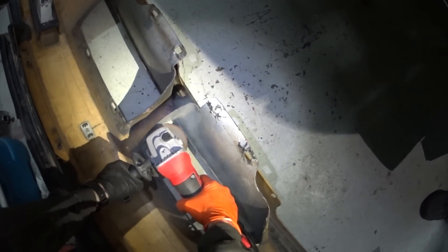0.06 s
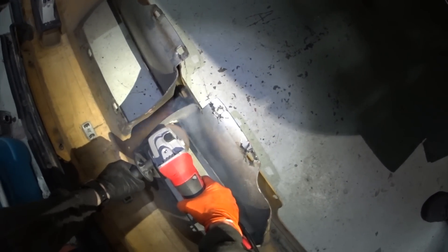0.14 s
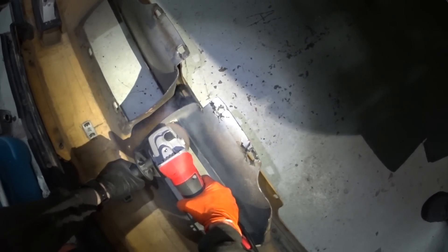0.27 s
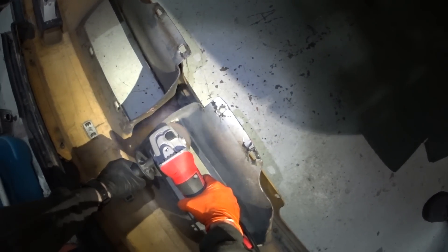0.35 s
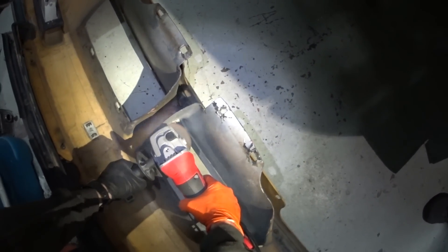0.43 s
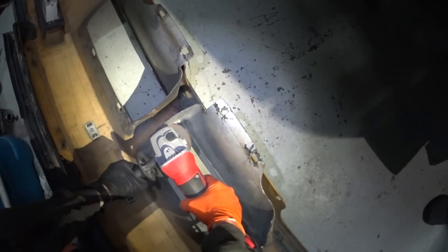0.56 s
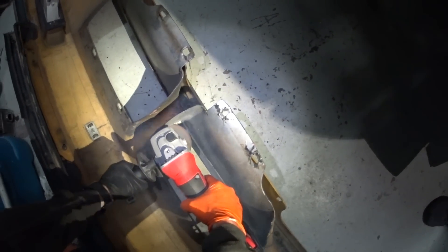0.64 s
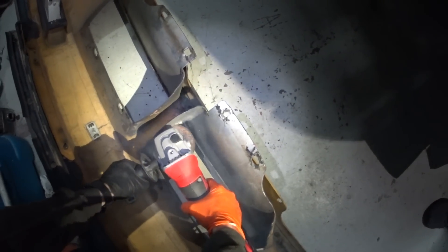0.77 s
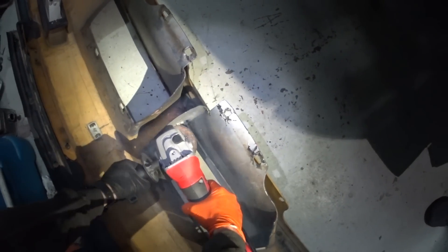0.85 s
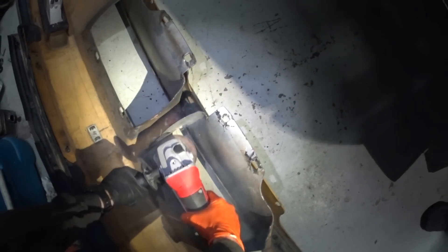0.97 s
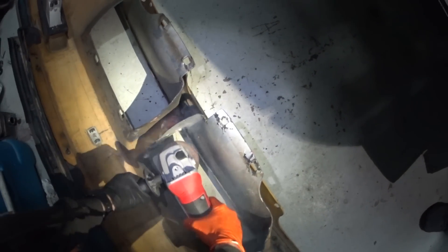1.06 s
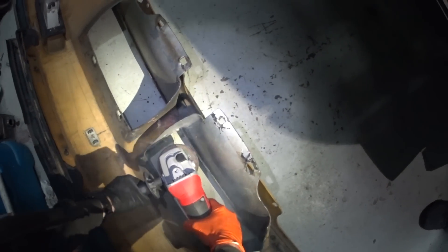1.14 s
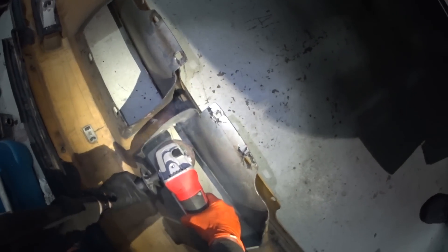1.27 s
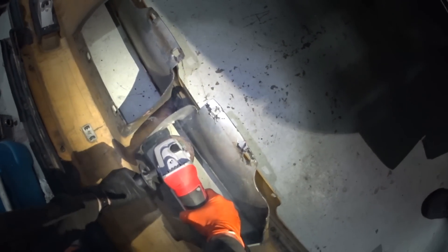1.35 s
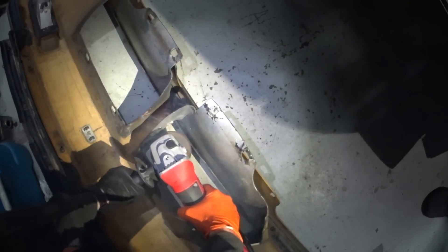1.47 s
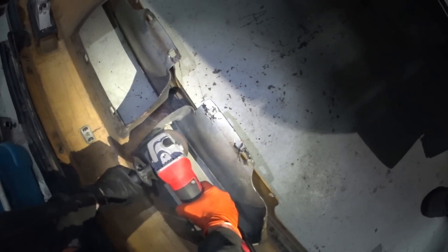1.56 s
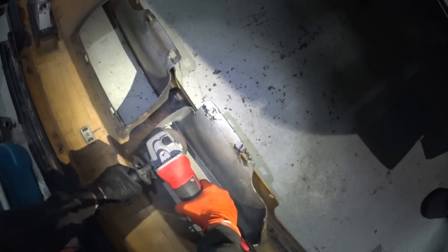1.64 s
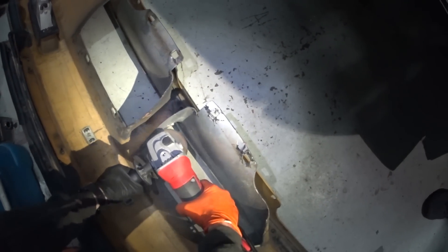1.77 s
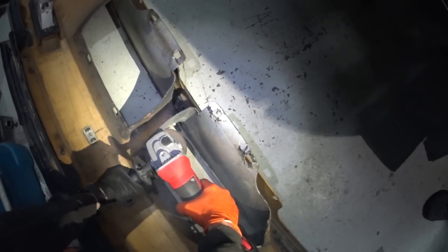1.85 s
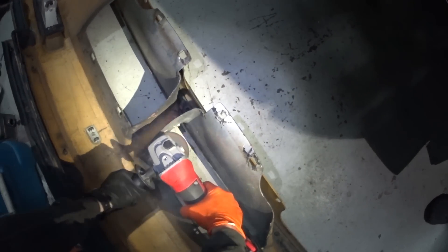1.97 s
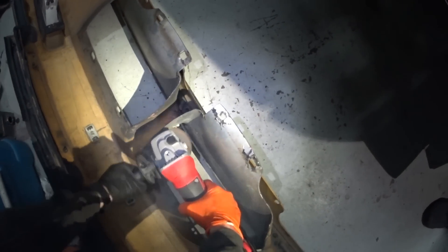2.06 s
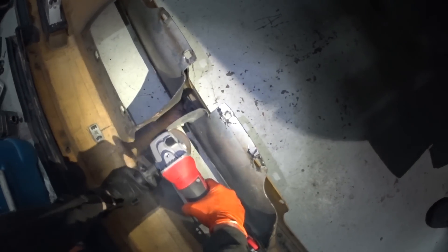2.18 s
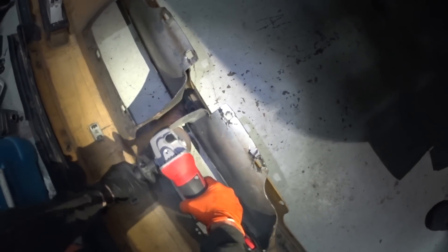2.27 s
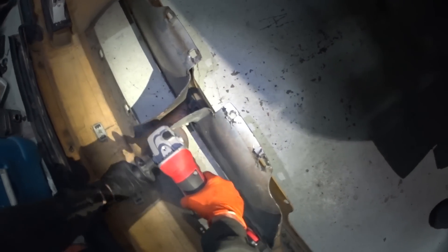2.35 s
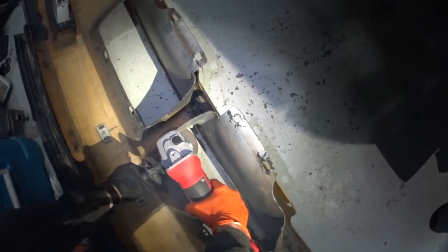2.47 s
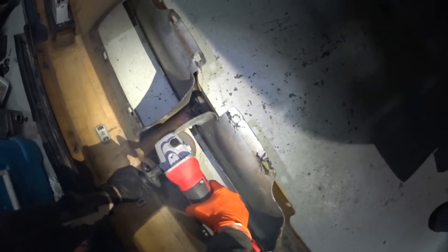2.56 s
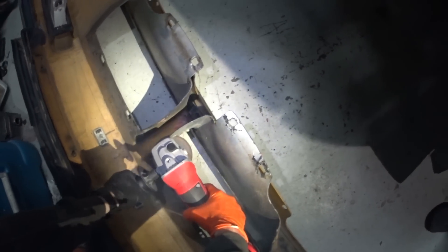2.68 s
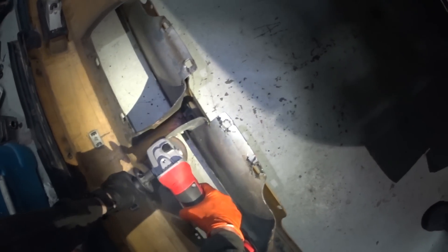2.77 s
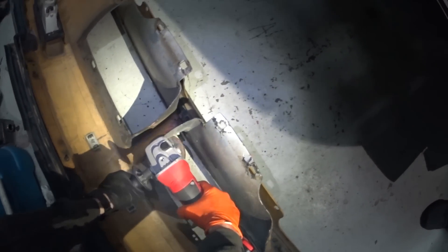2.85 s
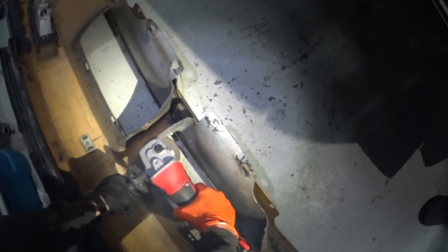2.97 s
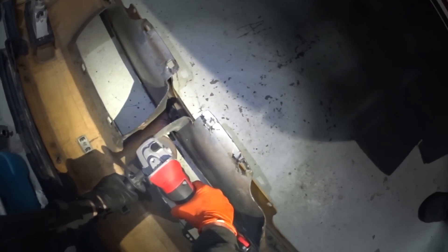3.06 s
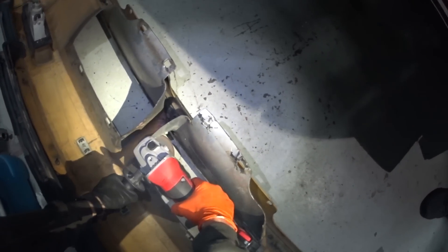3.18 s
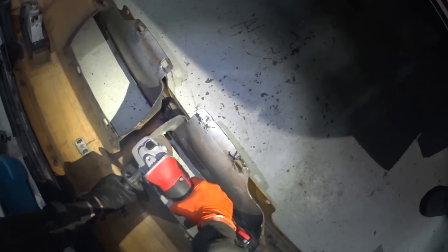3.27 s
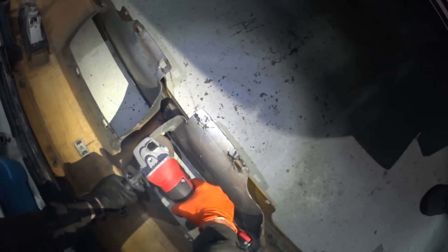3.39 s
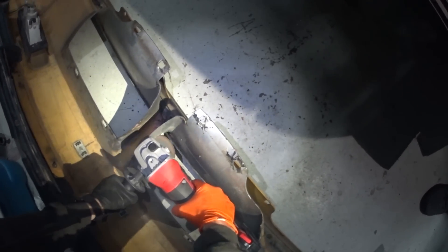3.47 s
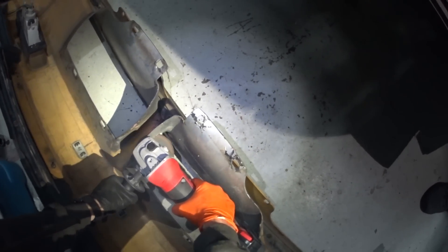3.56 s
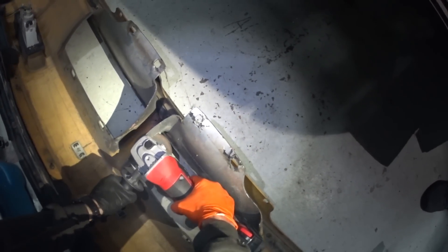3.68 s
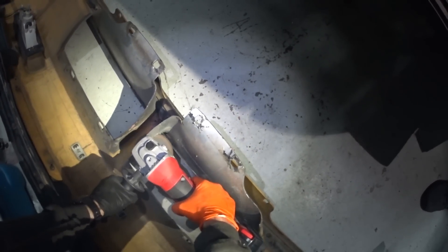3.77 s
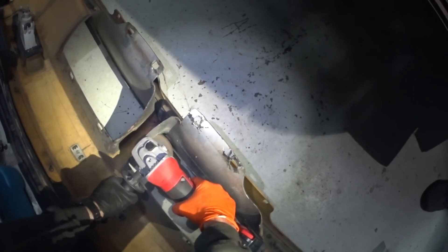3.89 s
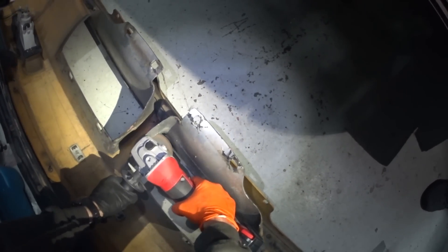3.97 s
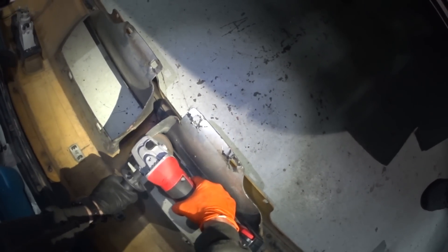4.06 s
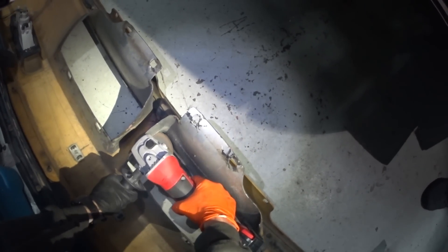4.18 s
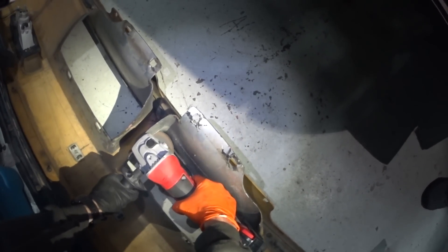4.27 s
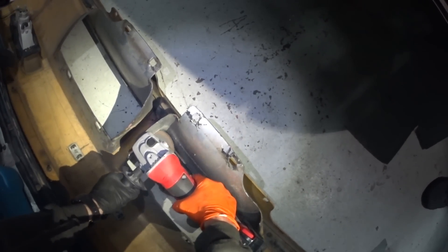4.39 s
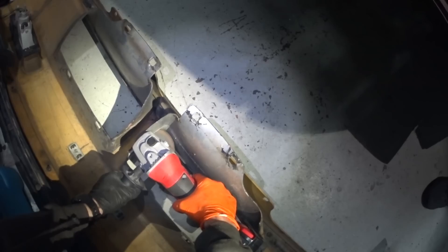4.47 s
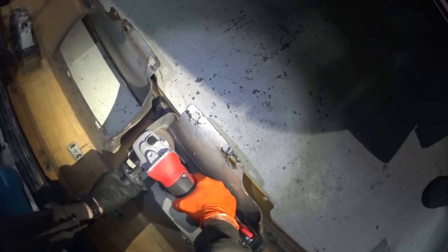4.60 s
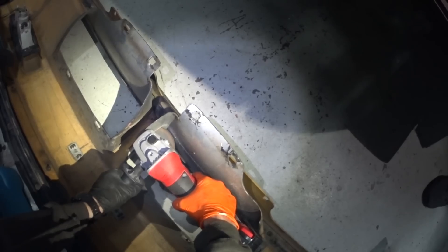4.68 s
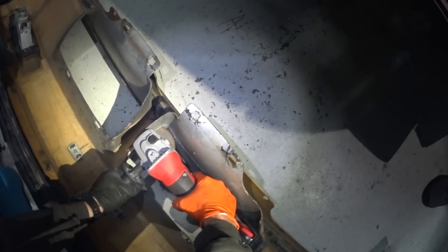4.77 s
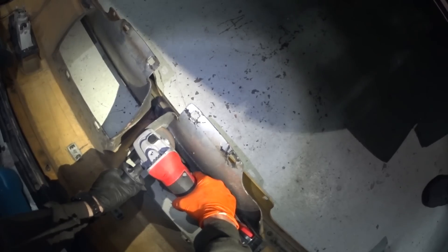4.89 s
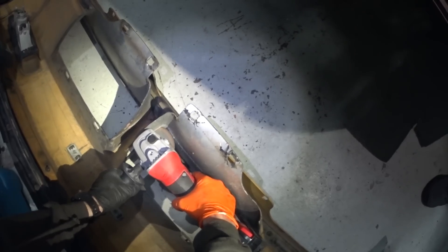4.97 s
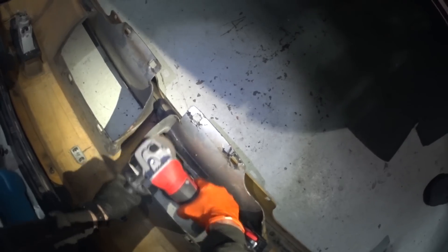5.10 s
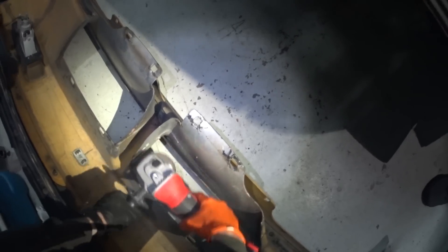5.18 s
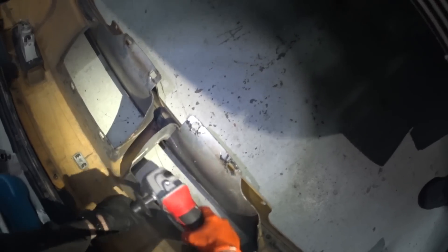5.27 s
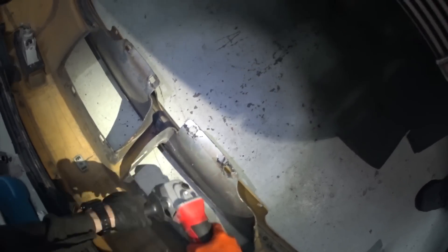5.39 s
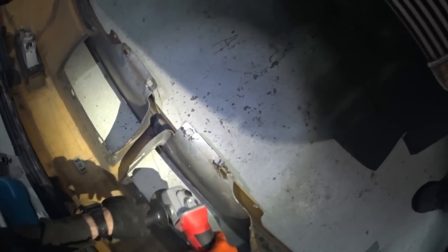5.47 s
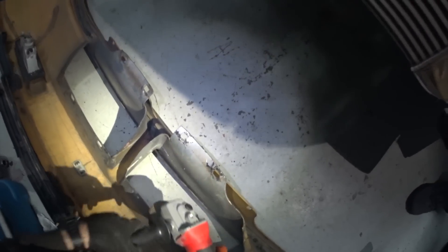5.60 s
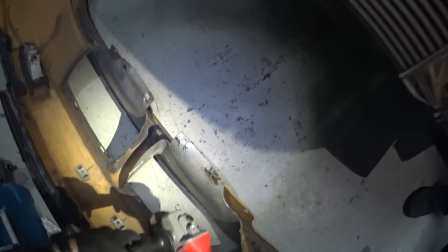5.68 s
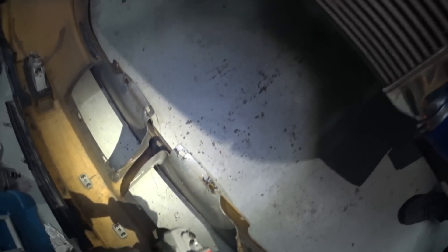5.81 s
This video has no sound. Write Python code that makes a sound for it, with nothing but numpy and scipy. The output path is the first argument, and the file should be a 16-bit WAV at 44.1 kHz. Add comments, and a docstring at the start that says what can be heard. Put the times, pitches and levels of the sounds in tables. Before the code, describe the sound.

Very close to the microphone, a handheld rotary cutter is already grinding into a plastic car panel, its buzz sagging in pitch until it stops. A few short scrapes and a switch click follow, then a faster, rougher second run ending in a squeak. A third, steadier run lasts about two seconds before the motor winds down amid bright rattles and rustling in a small workshop.

```python
"""Rotary cutter in a plastic panel

A handheld rotary cutter bites into a plastic car panel in three runs, close by, in a workshop.
Each turn strikes the same two tooth blows, set off the panel's ringing; irregular chatter blurs them into noise.
Gears sing and blade modes ping along. Between runs, short noise strokes are single teeth snagging.
A 15-slot motor whines in sine partials when it runs free. Short ringing modes make a squeak as the second
run ends and a rattle as the tool slows and is lifted away, with fine noise grains for the rustle."""
import sys
import numpy as np
from scipy import signal
from scipy.fft import rfft, irfft
from scipy.io import wavfile
from scipy.ndimage import uniform_filter1d

SR = 44100
rng = np.random.default_rng(int(sys.argv[2]) if len(sys.argv) > 2 else 0)


def generate_wav(sig):
    """Save sig (samples, or channels by samples) to the path in sys.argv[1] as 16-bit PCM at SR."""
    pcm = np.round(np.clip(np.atleast_2d(sig).T, -1, 1) * 32767).astype(np.int16)
    wavfile.write(sys.argv[1], SR, pcm)


N = 257544
T = np.arange(N) / SR


def amp(db):
    """Turn dB into a gain."""
    return 10 ** (np.asarray(db) / 20)


def rms_one(x):
    """Scale a sound to rms 1."""
    return x / np.sqrt(np.mean(x ** 2) + 1e-20)


def in_time(rows):
    """Read each column of a curve table at every sample."""
    s, *columns = np.transpose(rows)
    return [np.interp(T, s, c) for c in columns]


def while_on(start, stop, fade, t=T):
    """Gain of 1 from start to stop, fading in a straight line outside."""
    return np.clip(np.minimum(t - start, stop - t) / fade + 1, 0, 1)


def swell(full, until, rise, fall):
    """Gain that climbs, holds at 1 and falls, at rates in dB per s."""
    return amp(-rise * np.maximum(full - T, 0) - fall * np.maximum(T - until, 0))


def fourier_hz():
    """Frequency of each bin of a whole-length Fourier spectrum, kept at 1 Hz or more for the log axis."""
    return np.maximum(np.arange(N // 2 + 1) * SR / N, 1)


def at_hz(points, hz):
    """Read a spectrum table on a log frequency axis."""
    table = np.array(points)
    return np.interp(np.log(hz), np.log(table[:, 0]), table[:, 1])


def shape(spectrum, peaks=()):
    """Gain by frequency: a smooth spectrum plus resonance bumps and hollows."""
    hz = fourier_hz()
    bumps_db = sum(db / (1 + ((hz - centre) / (width / 2)) ** 2) for centre, width, db in peaks)
    return amp(at_hz(spectrum, hz) + bumps_db)


def colour(x, spectrum):
    """Filter a sound by a spectrum table."""
    return irfft(rfft(x) * shape(spectrum), N)


def band(bins, low_hz, high_hz, slope=5.8):
    """One smooth-edged frequency band of a Fourier spectrum, as sound of rms 1."""
    hz = np.arange(N // 2 + 1) * SR / N + 1
    below_high = 1 / (1 + (hz / high_hz) ** (2 * slope))
    below_low = 1 / (1 + (hz / low_hz) ** (2 * slope))
    return rms_one(irfft(bins * (below_high - below_low), N))


def drift(rate):
    """Slow random wander of spread 1; a higher rate in Hz wanders faster."""
    r = np.exp(-2 * np.pi * rate / SR)
    return rms_one(signal.lfilter([1], [1, -2 * r, r * r], rng.standard_normal(N + SR))[SR:])


def tooth_blows(turns_per_s, wander=.0015, second_db=-5, half=.47, ring_t60=0.05, ripple=0.35, creep=0.62):
    """Two uneven blows a turn set off the panel's dense ringing, which changes slowly as the blade advances."""
    turn = np.cumsum(turns_per_s * (1 + wander * drift(15))) / SR
    clicks = np.zeros(N + 1)
    for offset, db in [(0, 0), (half, second_db)]:
        at = np.flatnonzero(np.diff(np.floor(turn + offset))) + 1
        late = (turn[at] + offset) % 1 * SR / turns_per_s[at]   # the blow falls between two samples
        clicks[at - 1] += amp(db) * late
        clicks[at] += amp(db) * (1 - late)

    t = np.arange(4096) / SR
    rings = rfft(rng.standard_normal((2, 4096)) * amp(-60 * t / ring_t60))
    rings = irfft(rings / np.abs(rings) ** (1 - ripple))   # many modes even out the response
    angle = creep * drift(0.99)
    mixes = [np.cos(angle), np.sin(angle)]   # slow crossfade between the two ringings
    blows = sum(signal.fftconvolve(clicks[:N] * mix, ring)[:N] for mix, ring in zip(mixes, rings))
    return blows / np.sqrt(uniform_filter1d(blows ** 2, size=4000) + 1e-9), turn


def chatter(turn):
    """Irregular blows: noise that pulses twice a turn and flickers in level, at rms 1."""
    pulses = 1 + 0.21 * np.cos(4 * np.pi * turn)
    return rms_one(rng.standard_normal(N) * pulses * amp(2.67 * drift(30)))


CHATTER, SETTLE_S = .8, .06   # usual share of irregular blows (0-1), fade into and out of steady cutting
# spells of steadier cutting: start_s, end_s, irregular_share (0-1)
STEADY_SPELLS = [(0, .72, .09), (1.73, 1.91, .22), (2.32, 2.36, .5), (2.52, 2.59, .1), (3.2, 3.75, .12),
                 (3.75, 5.0, .07)]


def chatter_share():
    """The blade chatters, except while it cuts steadily."""
    calm = [(CHATTER - least) * while_on(a, b, SETTLE_S) for a, b, least in STEADY_SPELLS]
    return CHATTER - np.max(calm, axis=0)


def gear_song(turn, teeth=68):
    """Gear teeth meshing: a sine at the tooth rate, wavering in phase and level."""
    waver = 1.2 * np.sin(4 * np.pi * turn) + .6 * drift(30)
    return np.sin(2 * np.pi * teeth * turn + waver) * amp(3.6 * drift(9.1))


PING_DB, PING_T60_S = 0, .0065   # level relative to the buzz, decay time of one resonator
# ringing modes of the blade: pitch_hz, level_db (relative), point in the turn (0-1)
BLADE_MODES = [(2050, -8, .3), (2750, 0.5, 0), (3500, -2, .76), (5500, -5, .7)]


def ping(turn):
    """Each blade mode swells and rings briefly once a turn, at its own point of the turn; rms 1."""
    r, out = amp(-60 / (PING_T60_S * SR)), 0
    for hz, db, point in BLADE_MODES:
        ring = np.diff(np.floor(turn - point), prepend=0)
        for again in range(2):   # two resonators in a row make the soft swell
            ring = signal.lfilter([1, 0, -1], [1, -2 * r * np.cos(2 * np.pi * hz / SR), r * r], ring)
        out = out + amp(db) * ring
    return rms_one(out)


# cutting runs: full_s, until_s, fall_db_per_s, drone_db, buzz_db, hiss_db (levels before bite and the rest)
RUNS = [(-.3, 0.721, 900, -24.5, -21, -20.5), (1.427, 2.766, 304, -24.5, -21, -18.5),
        (2.97, 5.181, 600, -23.5, -21.5, -20.3)]
RISE_DB_PER_S = 1900
# cutting spectrum, one list per run: pitch_hz, level_db (per Hz, relative within a band)
CUT_SPECTRA = [
    [(59, -77.5), (100, -44), (493, -30.5), (601, -18), (1250, -8.5), (2080, -1.5), (3910, -8), (8260, -17),
     (10100, -12), (11100, -12)],
    [(59, -69), (100, -33.5), (216, -23), (353, -14.5), (438, -12.5), (1090, -0.5), (2790, -1.5),
     (4570, -1), (9480, 4), (11100, 2)],
    [(59, -80), (100, -44), (170, -28), (421, -12), (523, -9.5), (1060, -3), (1490, -8), (2740, -7.5),
     (4570, -13), (9860, -8.5), (11100, -11.5)],
]
# panel and blade resonances, one list per run as the place of the cut shifts:
# pitch_hz, width_hz, level_db (negative is a hollow)
PANEL_PEAKS = [
    [(627, 88, 6), (866, 45, 10.5), (1087, 140, 9), (1266, 160, 7.5), (1640, 92, 9), (2060, 130, 4),
     (3940, 1100, -8), (6930, 310, 14), (9840, 380, 9)],
    [(728, 44, 4.5), (1810, 200, -3), (2780, 1100, 5.5), (4172, 1600, -5), (6700, 250, 7), (9160, 320, 6)],
    [(630, 135, 5), (1088, 130, 5.5), (1290, 120.1, 5), (880, 41, 3.5), (2030, 620, 3), (4530, 1300, -3.5),
     (6550, 110, 3), (9340, 995, 3)],
]
# how hard the blade bites, and the boom below about 600 Hz: time_s, bite_db, boom_db
BITE = [(0, 1, -46), (.33, -1, -48), (.72, 0, -31.5), (1.44, -4, -66), (1.51, -7, -64), (1.55, -20.5, -60),
        (1.63, -18.5, -56), (1.68, -12.5, -58), (1.742, -11, -32.5), (1.87, -11.5, -40), (1.98, -3.5, -40),
        (2.03, -11.5, -42), (2.164, 2, -42.5), (2.218, -2, -25.5), (2.296, 3.5, -44), (2.416, 1, -30.5),
        (2.52, 0, -33.5), (2.61, 2, -26), (2.71, 0, -32.5), (2.8, -7, -39), (2.97, -8.5, -58),
        (3.01, -6, -32.5), (3.13, -0.5, -32.5), (3.34, 0.5, -42), (3.46, 3, -31.5), (3.66, -4.5, -35),
        (3.73, 2.5, -32), (4.21, -0.5, -35.5), (4.7, 0, -30), (4.99, -2, -38), (5.04, -4, -28.5),
        (5.18, -3, -44.5)]
BUZZ_FOLLOWS, HISS_FOLLOWS = 0.48, -0.12   # dB per dB of bite
# the buzz swells briefly: time_s, extra_db
BUZZ_SWELLS = [(.52, 3.96), (1.75, 7.1), (1.93, 5), (2.16, 3.3), (3.04, 3.95), (5.17, 7.7)]
BUZZ_SWELL_S = 0.046   # spread of each swell before and after its time
HISS_BUILD_DB, HISS_BUILD_S = 5, .08   # the hiss builds up late
HISS_EARLY_S, HISS_EARLY_DB_PER_S = .2, 28   # and thins before the stop


def cutting(turns):
    """Regular blows and irregular chatter share the panel and blade resonances; gears and pings join in."""
    bite_db, boom_db = in_time(BITE)
    buzz_swell_db = sum(db * np.exp(-((T - s) / BUZZ_SWELL_S) ** 2) for s, db in BUZZ_SWELLS)
    regular, turn = tooth_blows(turns)
    irregular = chatter(turn)
    share = chatter_share()
    slower_db = 22 * np.minimum(np.log2(turns / 76), 0)   # a labouring blade loses its top
    gears = (1 - share) * gear_song(turn)
    pings = (1 - share) ** 3 * ping(turn)   # chatter smears the ping

    out = shudder(turn)
    for row, spectrum, peaks in zip(RUNS, CUT_SPECTRA, PANEL_PEAKS):
        full, until, fall, drone_db, buzz_db, hiss_db = row
        drone_db = drone_db + bite_db
        buzz_db = buzz_db + BUZZ_FOLLOWS * bite_db + buzz_swell_db
        hiss_db = hiss_db + HISS_FOLLOWS * bite_db
        hiss_db -= HISS_BUILD_DB * np.exp(-np.abs(T - full) / HISS_BUILD_S)
        hiss_db -= HISS_EARLY_DB_PER_S * np.maximum(T - until + HISS_EARLY_S, 0)
        # low_hz, high_hz, blur power (a smaller one lets chatter in sooner: treble blurs first), level_db
        bands = [(102, 628, 1.3, boom_db),
                 (614, 1450, 1.24, drone_db),
                 (1480, 4270, 0.65, buzz_db),
                 (4410, 7020, 0.7, hiss_db - 5.5 - 0.11 * slower_db),
                 (7520, 12600, 0.42, hiss_db - 3.5 + slower_db)]
        run = amp(hiss_db - 9.5 + slower_db) * gears + amp(buzz_db + PING_DB) * pings
        panel = shape(spectrum, peaks)
        for low, high, blur, db in bands:
            blows = np.sqrt(1 - share ** blur) * regular + np.sqrt(share ** blur) * irregular
            run += amp(db) * band(rfft(blows) * panel, low, high)
        out += swell(full, until, RISE_DB_PER_S, fall) * run
    return out


PATCHY_DB, PATCH_BINS, PATCH_FRAMES = 1.5, 3, 14   # depth; width and length in frame cells


def patches(cells):
    """Randomly shifting colour: smoothed hills and hollows over frequency and time, of spread 1."""
    field = rng.standard_normal(cells)
    for again in range(2):
        field = uniform_filter1d(field, size=PATCH_BINS, axis=0)
        field = uniform_filter1d(field, size=PATCH_FRAMES, axis=1)
    return rms_one(field)


# resonances that bloom and glide as the blade moves through the panel:
# start_s, end_s, from_hz, to_hz, width_hz, level_db (negative is a hollow)
BLOOMS = [(0.042, 0.457, 1110, 1053, 90, 8), (.18, 0.337, 1270, 1200, 100, 6.5),
          (.39, .73, 1440, 1170, 110, 9), (.4, 0.567, 2250, 2090, 120, 7.5), (0, .13, 1670, 1630, 70, 7),
          (.56, .73, 2710, 2870, 200, 4.5), (.54, .72, 4370, 4330, 500, 6), (1.43, 1.51, 1000, 990, 120, 7),
          (1.53, 1.68, 1700, 2300, 1500, -6), (1.88, 2.32, 2100, 2040, 150, 6),
          (1.934, 1.98, 2870, 2650, 200.2, 5), (2.1, 2.126, 1500, 1499, 400, 8),
          (1.73, 1.873, 810, 720, 300, 6.5), (2.51, 2.596, 1200, 1200, 250, 5),
          (3.15, 3.45, 715, 690, 60, 5.5), (3.2, 3.534, 1140, 1050, 100, 7.5),
          (3.16, 3.44, 2970, 3000, 300, 5.5), (3.2, 3.4, 2450, 2450, 400, -5.5),
          (3.46, 3.6, 2500, 2320, 200.1, 5), (3.59, 3.923, 1249, 1193, 120, 12.5),
          (3.66, 4.1, 435, 416, 45, 15.5), (3.8, 3.88, 3300, 3180, 250, 6.5),
          (4.15, 4.651, 2430, 2200, 220, -14.5), (4.16, 4.95, 2780, 2800, 330, 4.5),
          (4.65, 4.9, 4500, 4450, 200, -8), (4.91, 5.03, 4400, 4550, 600, -14),
          (3.92, 4.68, 3510, 3490, 100, 4), (5.02, 5.18, 1100, 1160, 150, 7.5),
          (5.12, 5.2, 2080, 2199, 200, 4.5)]
BLOOM_FADE_S = 0.033


def blooms(x):
    """Passing resonances and random patches colour the sound frame by frame."""
    hz, s, frames = signal.stft(x, SR, nperseg=1024, noverlap=768)
    db = PATCHY_DB * patches(frames.shape)
    for a, b, from_hz, to_hz, width, top_db in BLOOMS:
        on = while_on(a, b, BLOOM_FADE_S, s)
        centre = np.interp(s, [a, b], [from_hz, to_hz])
        db = db + top_db * on / (1 + ((hz[:, None] - centre) / (width / 2)) ** 2)
    return signal.istft(frames * amp(db), SR, nperseg=1024, noverlap=768)[1][:N]


# colour of the steady workshop noise: pitch_hz, level_db (per Hz, relative)
SHOP_SPECTRUM = [(59, -43), (100, -8), (837, 0), (1100, -9), (2920, -6.5), (9240, -19), (11500, -33.5),
                 (15000, -65.5)]
SHOP_DB = -65


def workshop():
    """Steady background: noise filtered to the workshop's colour."""
    return amp(SHOP_DB) * rms_one(colour(rng.standard_normal(N), SHOP_SPECTRUM))


# single teeth snagging between runs: time_s, level_db (relative), treble_db (over the low part)
SNAGS = [(0.763, -35, -10), (0.811, -19.5, -0.5), (0.916, -32, 0.5), (.93, -37, 2), (1.015, -30.5, 6.5),
         (1.027, -23.5, 5), (1.04, -29, 1.5), (1.05, -25.5, 1), (1.077, -28.5, 5), (1.11, -13, 3),
         (1.129, -29, 2), (1.142, -26, -1), (1.151, -18, 5), (1.181, -31, 4.5), (2.895, -37.5, 9.5)]
SNAG_RISE_S_PER_DB, SNAG_T60_S = .00022, 0.053


def snags():
    """Short scrapes: panel noise that swells and dies; the weaker, the slower the swell."""
    noise = rfft(rng.standard_normal(N)) * shape(CUT_SPECTRA[1], PANEL_PEAKS[1])
    low, high = band(noise, 324, 4850), band(noise, 4200, 14000)
    out = np.zeros(N)
    for s, db, treble_db in SNAGS:
        rise = SNAG_RISE_S_PER_DB * -db
        t = T - s + 0.75 * rise   # the swell begins a little before the listed time
        stroke = np.clip(t / rise, 0, 1) ** 2 * amp(-60 * np.maximum(t - rise, 0) / SNAG_T60_S)
        out += amp(db - 5) * stroke * (low + amp(treble_db) * high)
    return out


def trigger(s=1.381, db=-50, hz=2100, t60=0.027):
    """The switch clicks before the second run: a dying burst of mid-band noise."""
    burst = amp(db - 60 * np.maximum(T - s, 0) / t60) * (T > s)
    return burst * band(rfft(rng.standard_normal(N)), 0.68 * hz, 1.4 * hz)


SLOTS = 15   # whine cycles per spindle turn
# motor running free: start_s, end_s, first_db, second_db, third_db (partials at the start),
# fade_db_per_s (times 1.5, 2.5 and 3.5 for the three partials)
FREE_RUNNING = [(1.554, 1.915, -42, -52, -31.5, 1), (5.208, 5.54, -54, -50, -60, 14),
                (5.555, 5.664, -58, -75, -80, 14)]


def whine(turns):
    """Motor slots passing by: three wavering partials of the slot rate."""
    phase = 2 * np.pi * np.cumsum(SLOTS * turns * (1 + 0.00099 * drift(33))) / SR
    partials = [np.sin((k + 1) * phase) * amp(3.0 * drift(14)) for k in range(3)]
    out = np.zeros(N)
    for a, b, *levels, fade in FREE_RUNNING:
        on = while_on(a, b, 0.017)
        for k, db in enumerate(levels):
            fading_db = db - (k + 1.5) * fade * np.maximum(T - a, 0)
            out += on * amp(fading_db) * partials[k]
    return np.sqrt(2) * out


# shudders of the loose panel: full_s, until_s, level_db
SHUDDERS = [(2.58, 2.69, -34), (3.058, 3.103, -35.5)]
SHUDDER_RISE_DB_PER_S, SHUDDER_FALL_DB_PER_S = 300, 500


def shudder(turn):
    """The loose panel shudders: a low sine, two cycles a turn."""
    level = sum(amp(db) * swell(a, b, SHUDDER_RISE_DB_PER_S, SHUDDER_FALL_DB_PER_S) for a, b, db in SHUDDERS)
    return np.sqrt(2) * np.sin(4 * np.pi * turn) * level


# short ringing sounds, a high and a lower part; the first is a squeak as the second run ends,
# the others are loose parts rattling: time_s, high_db, high_hz, low_db, low_hz
SHORT_RINGS = [(2.812, -48, 8000, -21, 2777), (5.221, -27, 6080, -25, 2260), (5.2567, -22, 7990, -40, 1680),
               (5.2906, -27, 9300, -38, 1890), (5.315, -20, 8900, -39, 2510),
               (5.3328, -18.5, 9090, -37, 1770), (5.368, -34, 9860, -36, 1640),
               (5.4317, -13, 8740, -33.5, 2860), (5.437, -40, 8700, -36, 1750),
               (5.4938, -29, 6270, -42, 1850), (5.5301, -36, 8330, -44, 1880),
               (5.552, -38, 8300, -41, 2500), (5.5813, -29, 7730, -19.5, 3100),
               (5.6054, -23, 8660, -36, 3220), (5.6276, -23, 8140, -45, 3120),
               (5.6524, -25, 8520, -39, 3000), (5.6813, -31, 8300, -39, 3050),
               (5.7177, -21.5, 8340, -45, 1790), (5.7416, -40, 8310, -41, 2470),
               (5.755, -23, 8000, -32.5, 3340), (5.795, -36, 8200, -39, 3050)]


def squeak_and_rattle(high_t60=0.022, low_t60=0.036, crack_db=-12):
    """Each short sound rings a pair of close high modes and a lower pair over a short broad crack."""
    out, t = np.zeros(N + 2000), np.arange(2000) / SR
    soft = 1 - np.exp(-(t / .0014) ** 2)   # rounded attack
    spreads = rng.random((len(SHORT_RINGS), 2))
    cracks = rng.standard_normal((len(SHORT_RINGS), 2000))
    for (s, high_db, high_hz, low_db, low_hz), spread, crack in zip(SHORT_RINGS, spreads, cracks):
        ring = amp(high_db + crack_db - 60 * t / high_t60) * np.diff(crack, prepend=0)
        modes = [(high_hz, high_db, high_t60, spread[0]), (low_hz, low_db, low_t60, spread[1])]
        for f, level_db, t60, d in modes:
            neighbour = .5 * np.sin(2 * np.pi * f * (.94 + 0.043 * d) * t)
            ring += amp(level_db - 60 * t / t60) * (np.sin(2 * np.pi * f * t) + neighbour)
        start = round((s - .001) * SR)
        out[start:start + 2000] += soft * ring
    return out[:N]


# colour of the handling rustle: pitch_hz, level_db (per Hz, relative)
RUSTLE_SPECTRUM = [(88, -74), (150, -20), (516, -3.5), (2120, 0.5), (3350, -4), (5460, -3.5), (8000, 0),
                   (11500, -12), (15000, -42)]
LIFT_S, RUSTLE_LEVEL_DB, RUSTLE_FADE_DB_PER_S = 5.2, -44.5, 18.5


def rustle():
    """Glove, chips and panel as the tool is lifted: flickering noise that fades away."""
    grains = rng.standard_normal(N) * amp(2.9 * drift(72))
    fading = swell(LIFT_S, LIFT_S, RISE_DB_PER_S, RUSTLE_FADE_DB_PER_S)
    return rms_one(colour(grains, RUSTLE_SPECTRUM)) * amp(RUSTLE_LEVEL_DB) * fading


ROOM_T60_S, ROOM_DB, WALL_CUT_HZ = 0.25, -18.5, 2000


def room(x):
    """Echoes as dying noise tails, unrelated in the two channels, duller than the direct sound."""
    t = np.arange(int(.6 * SR)) / SR
    tails = rng.standard_normal((2, len(t))) * amp(-60 * t / ROOM_T60_S) * (t > .004)
    tails = signal.sosfilt(signal.butter(1, WALL_CUT_HZ, fs=SR, output="sos"), tails)
    return np.array([signal.fftconvolve(x, h / np.sqrt(np.sum(h ** 2)))[:N] for h in tails])


# left port compared with right: pitch_hz, level_db
LEFT_DB = [(60, 0.5), (140, -5.5), (350, -9), (840, -3), (2020, 1), (4880, -2.5), (11800, 2.5)]
# how far the left port leads the right: pitch_hz, lead in radians
LEFT_LEAD = [(0, 0), (1210, 0.13), (1550, -0.77), (2070, -0.19), (3360, -0.51), (4050, -0.5), (12000, 0.41)]


def ports(x):
    """Two close microphone ports differ in level and phase by frequency."""
    hz = fourier_hz()
    half = amp(at_hz(LEFT_DB, hz) / 2) * np.exp(.5j * at_hz(LEFT_LEAD, hz))   # each side takes half
    return irfft(rfft(x) * np.array([half, 1 / half]), N)


# spindle speed, sagging under load and slowing at the end: time_s, turns_per_s
SPEED = [(0, 78), (.19, 76.2), (.33, 70.6), (.48, 62), (.534, 60.5), (.59, 56), (.71, 49.5), (1.43, 75),
         (1.55, 106), (1.6, 122), (1.64, 128.7), (1.68, 131), (1.75, 129), (1.8, 127), (1.87, 119),
         (1.91, 111), (1.982, 86), (2.164, 106), (2.296, 102), (2.416, 96), (2.52, 115), (2.61, 108),
         (2.702, 125), (3.08, 129), (3.13, 95), (3.21, 101.4), (3.34, 100.5), (3.46, 96.5), (3.66, 86.5),
         (3.72, 87.5), (3.83, 86.4), (3.91, 83.3), (4.04, 82.1), (4.18, 80.3), (4.5, 80.1), (4.65, 78.8),
         (4.99, 82.8), (5.09, 88), (5.21, 78), (5.398, 49.7), (5.576, 32), (5.68, 22.5)]


def scene():
    """Tool and panel close by, the workshop around them."""
    turns, = in_time(SPEED)
    tool = blooms(cutting(turns)) + snags() + trigger() + whine(turns) + squeak_and_rattle() + rustle()
    return ports(tool + workshop()) + amp(ROOM_DB) * room(tool)


def gain_control(x, ceiling_db=-18, ratio=0.47, attack_s=0.0074):
    """Turn the sound down by a share of its smoothed loudness above the ceiling."""
    r = np.exp(-1 / (attack_s * SR))
    power = signal.lfilter([1 - r], [1, -r], np.mean(x ** 2, axis=0))
    level_db = 10 * np.log10(power + 1e-12)
    return x * amp(-ratio * np.maximum(level_db - ceiling_db, 0))


CUTOFF_HZ = 11000


def record(dry):
    """Gain control tames loud parts, peaks are rounded, deep bass and top are cut."""
    x = 0.84 * np.tanh(gain_control(dry) / 0.76)
    x = signal.sosfilt(signal.butter(3, 135, "high", fs=SR, output="sos"), x)
    return signal.sosfilt(signal.ellip(14, .5, 75, CUTOFF_HZ, fs=SR, output="sos"), x)


dry = scene()
out = record(dry)
generate_wav(out)
```